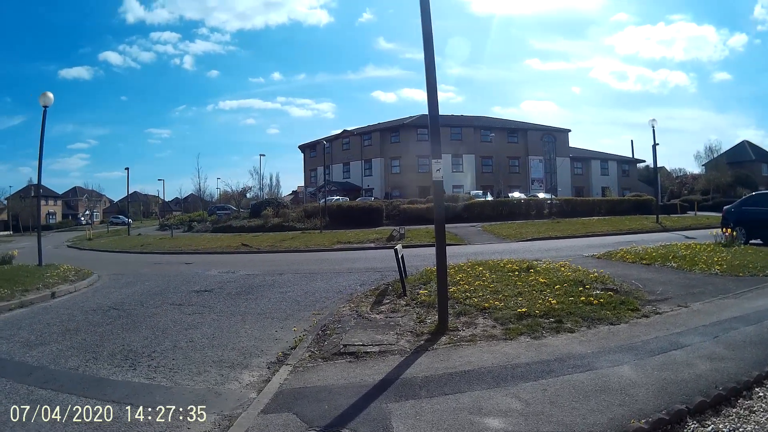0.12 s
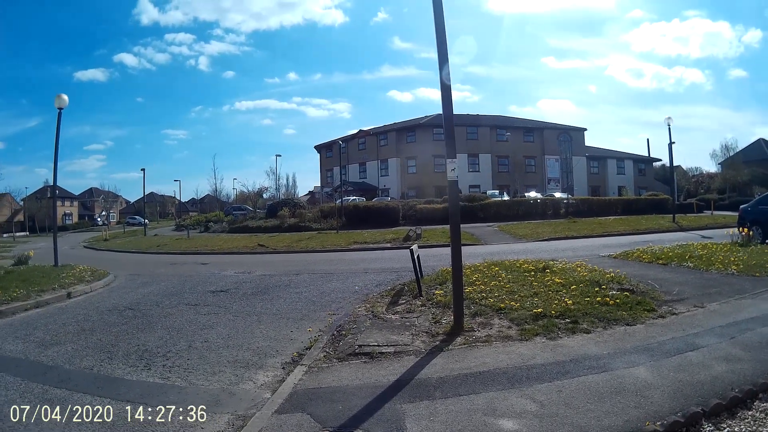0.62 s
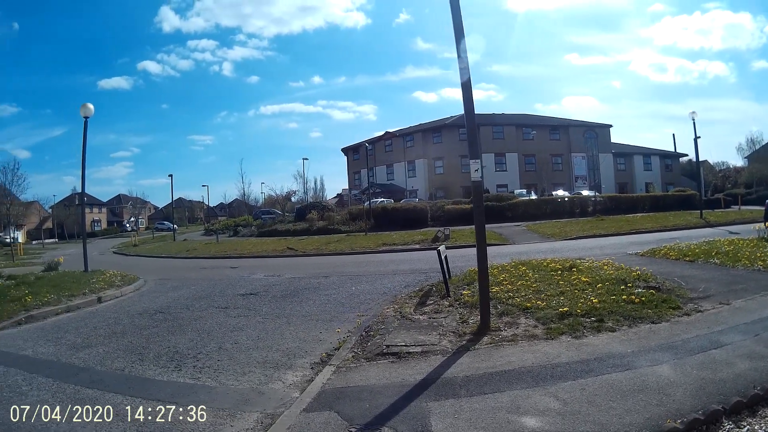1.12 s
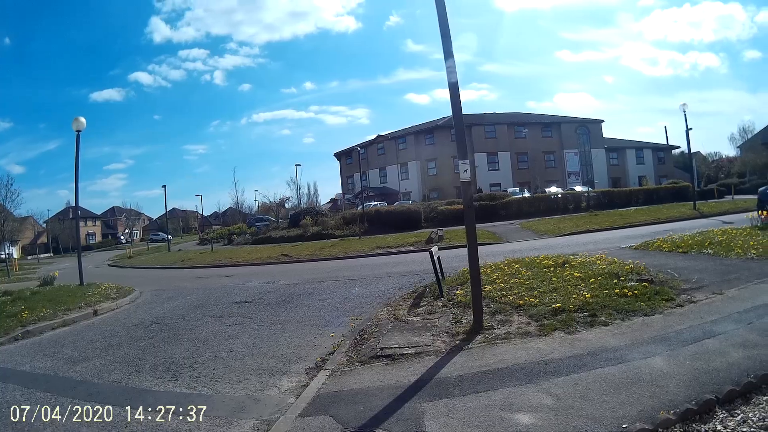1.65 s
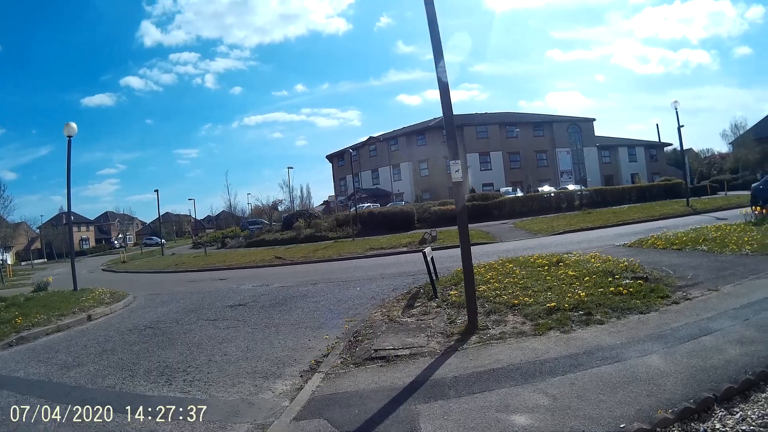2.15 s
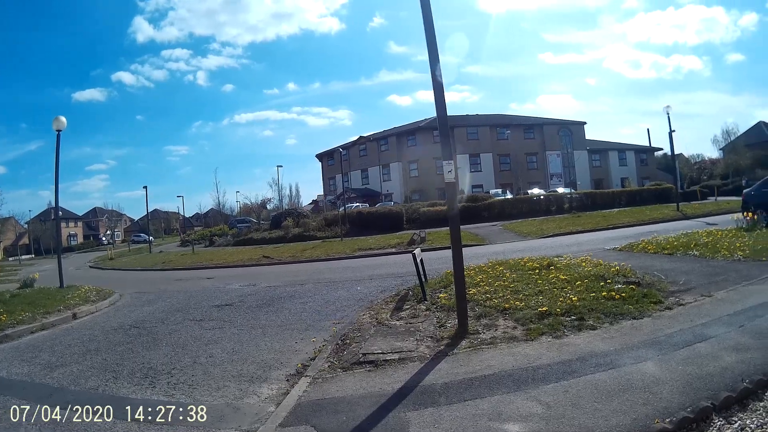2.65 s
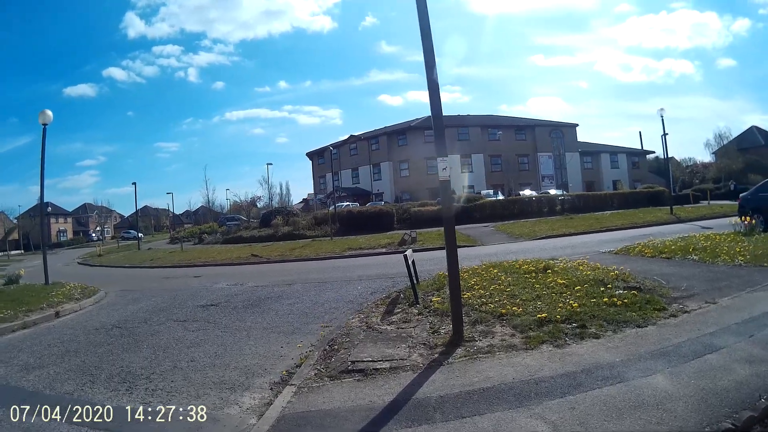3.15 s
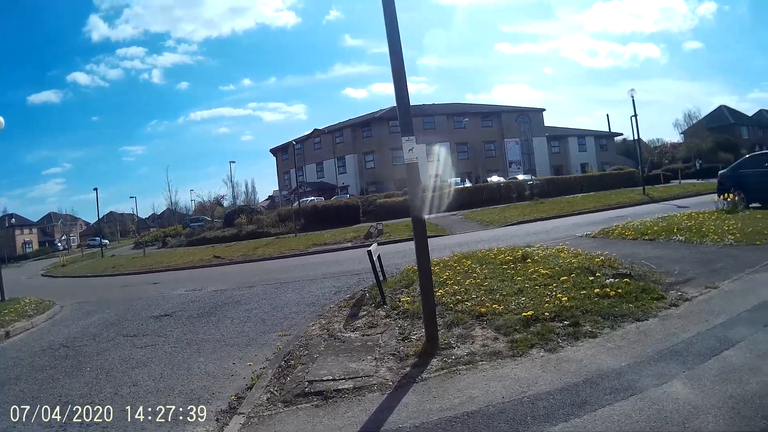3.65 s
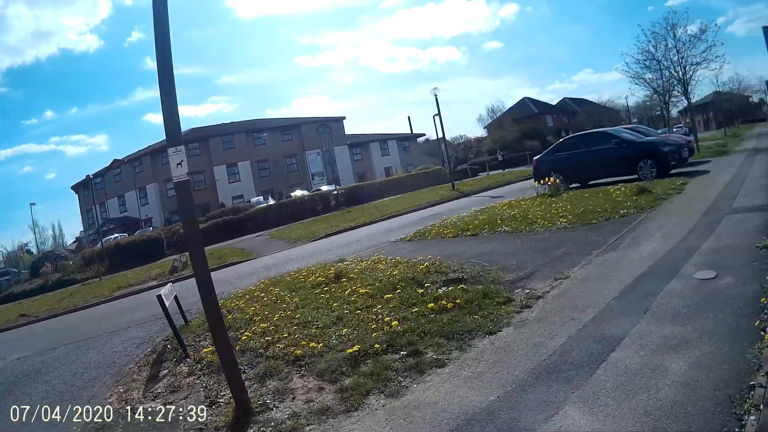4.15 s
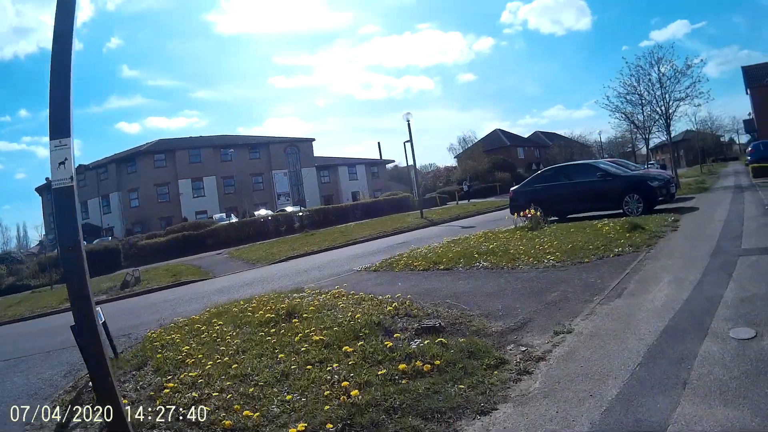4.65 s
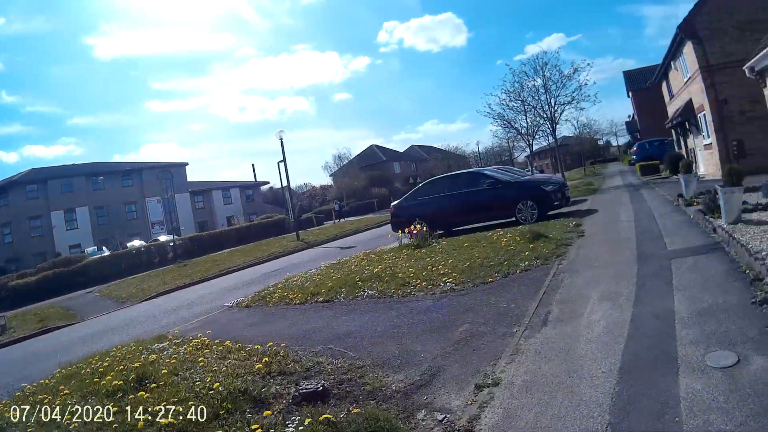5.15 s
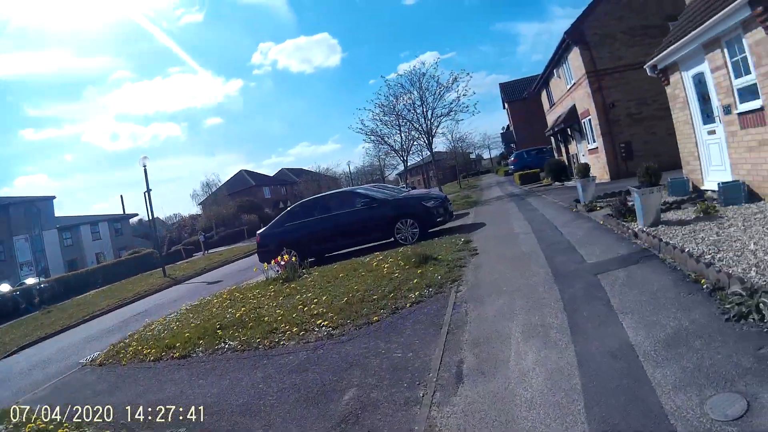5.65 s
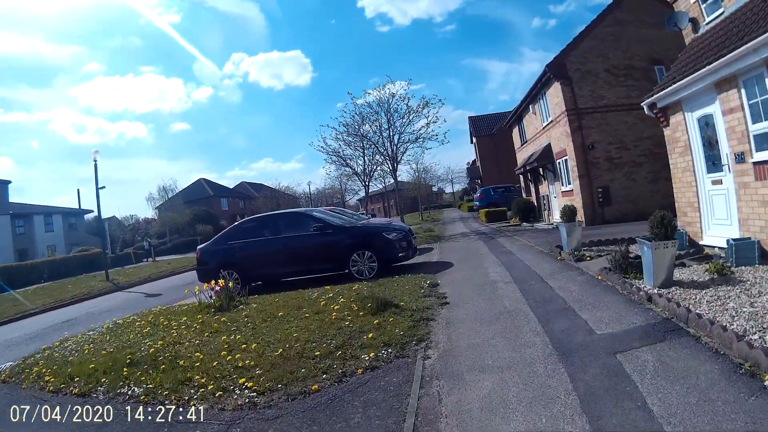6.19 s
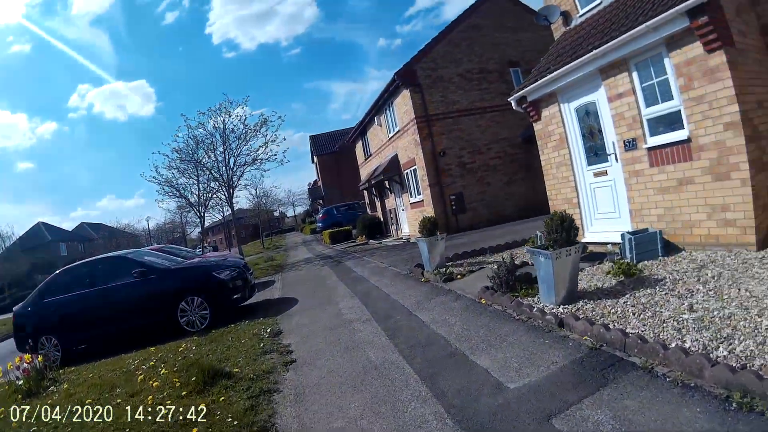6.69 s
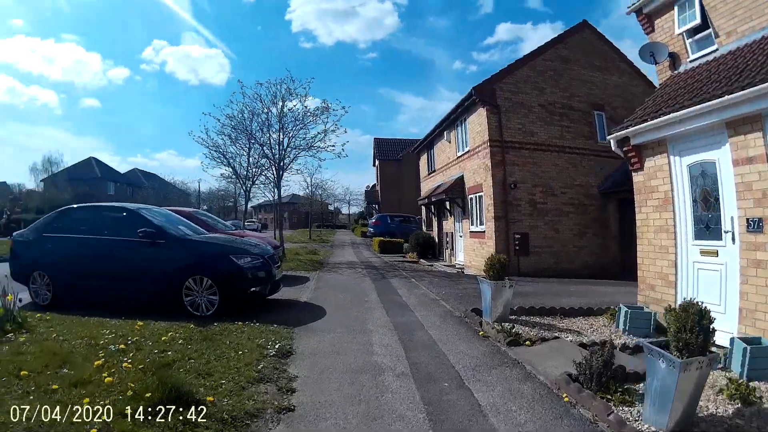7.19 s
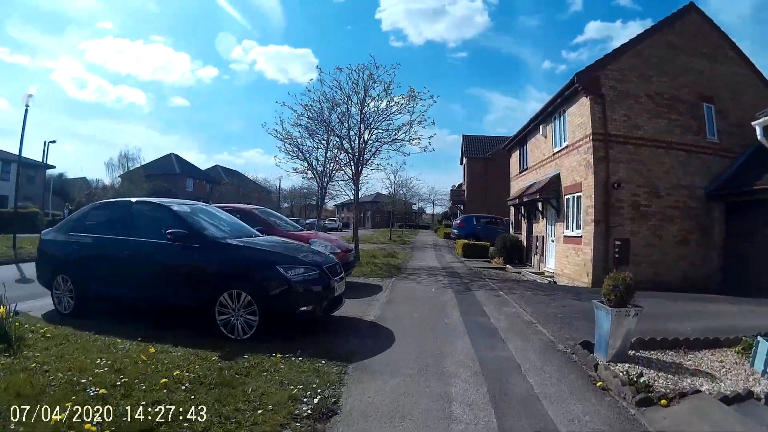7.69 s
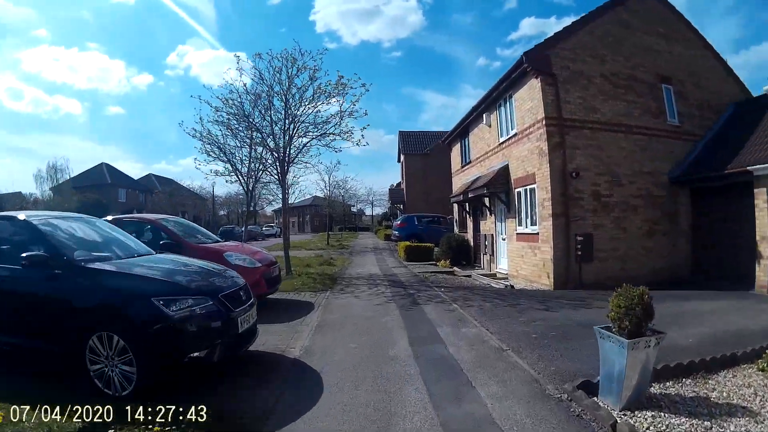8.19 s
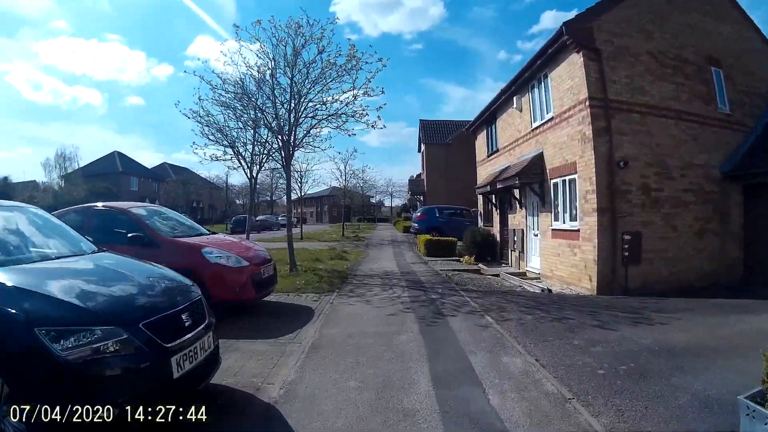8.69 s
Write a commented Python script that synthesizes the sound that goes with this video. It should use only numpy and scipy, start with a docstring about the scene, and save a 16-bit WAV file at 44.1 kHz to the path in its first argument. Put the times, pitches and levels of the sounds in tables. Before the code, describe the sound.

Sparse handling knocks and thumps on a bike frame give way to low tyre rumble, loose case rattle, faint chain ticks and sharp distorted cracks.

```python
"""A low handlebar sway and a humming frame are heard first, through the mount of a small camera on a bicycle.
The rider stands, shuffles and pushes off along a paved path. Sway is a wandering sine; frame, tyre and case
are noise through resonances. Parts knock into the plastic case as decaying modes and noise bursts, some
hard enough to clip; single tones swell and die away, the chain ticks in short tones, and the electronics
leak a faint chopped whistle over a background hiss of coloured noise."""
import sys
import numpy as np
from scipy import signal
from scipy.fft import rfft, irfft, next_fast_len
from scipy.io import wavfile
from scipy.ndimage import map_coordinates

SR = 44100
rng = np.random.default_rng(int(sys.argv[2]) if len(sys.argv) > 2 else 0)


def dump_mix(stems):
    """Bounce the given channels to the path in sys.argv[1] as a 16-bit WAV at rate SR."""
    frames = np.atleast_2d(stems).T  # one column per channel
    limited = np.clip(frames, -1, 1)  # hard clip at full scale
    pcm = np.round(limited * 32767).astype(np.int16)
    wavfile.write(sys.argv[1], SR, pcm)


def magnitude_from_level(level_db):
    """Linear magnitude for a level in decibels (20 dB per decade)."""
    exponent = np.asarray(level_db, float) / 20
    return 10 ** exponent


N = 388962


def unit(x):
    """Power normalisation: scaled to rms 1."""
    return x / np.sqrt(np.mean(x ** 2) + 1e-20)


def peak(x):
    """Amplitude normalisation: scaled to peak 1."""
    return x / np.abs(x).max()


def wobble(rate):
    """Band-limited random modulation: a smooth curve through rate random knots a second."""
    knots = rng.standard_normal(int(N * rate / SR) + 4)
    return map_coordinates(knots, [np.arange(N) * rate / SR])


def curve(table, column):
    """Linear interpolation in time: one column of a table, a value per sample."""
    rows = np.transpose(table)
    return np.interp(np.arange(N) / SR, rows[0], rows[column])


def filtered(x, response):
    """Linear filtering: the spectrum of x times a complex response of frequency."""
    m = next_fast_len(len(x) + 8192)
    return irfft(rfft(x, m) * response(np.fft.rfftfreq(m, 1 / SR)), m)[:len(x)]


def through(x, peaks):
    """Modal superposition: x through causal second-order resonances of alternating sign."""
    def response(f):
        total = 0
        for k, (centre, width, db) in enumerate(peaks):
            resonance = 1j * f * width / (centre * centre - f * f + 1j * f * width)
            total = total + (-1) ** k * magnitude_from_level(db) * resonance
        return total
    return filtered(x, response)


def dulled(x, hz):
    """Low-pass transmission: soft contacts and rubber pass little treble."""
    return signal.sosfilt(signal.butter(3, min(hz, SR / 2.2), fs=SR, output="sos"), x)


def grit(rate, spread_db, t60):
    """Shot-noise excitation: noise whose strength jumps at random small jolts and dies away."""
    sizes = magnitude_from_level(spread_db * np.minimum(rng.exponential(1, N), 3)) * (rng.random(N) < rate / SR)
    jolts = signal.lfilter([1], [1, -magnitude_from_level(-60 / (t60 * SR))], sizes)
    return (1 + jolts) * rng.standard_normal(N)


def ringing(modes, seconds):
    """Free modal decay: metal modes at a new strength for each blow, fluttering as the part wobbles."""
    t = np.arange(int(seconds * SR)) / SR
    total = np.zeros(len(t))
    for hz, db, t60 in modes:
        flutter_db = 1.8 * map_coordinates(rng.standard_normal(int(45 * seconds) + 4), [45 * t])
        total += magnitude_from_level(db + flutter_db - 60 * t / t60) * np.sin(2 * np.pi * hz * t)
    return total


def add(track, s, x):
    """Superposition: mixes x into the track from time s."""
    part = track[round(s * SR):][:len(x)]
    part += x[:len(part)]


# steady handlebar sway: start_s [s], level_db [dB]
STEADY_SWAY = [(0, -49), (.17, -50.5), (1.35, -52), (1.75, -58), (2.3, -49), (2.85, -57), (3.4, -52),
               (4.4, -36.5), (5.4, -40), (6.1, -33), (6.5, -42), (7.4, -32), (8.1, -39.5), (8.82, -34.5)]
# pushes that set the handlebar swinging: start_s [s], level_db [dB], t60_s [s]
SWINGS = [(.3, -36, 1), (.5, -37.5, 1.2), (.97, -32, 1.2), (1.3, -36, 1.5), (1.94, -26, 1.5),
          (2.35, -31.5, 1.5), (3.2, -37.5, .8), (3.439, -30, 2), (3.999, -35, 2), (5.15, -31.5, 1.2),
          (5.46, -33, 1.5), (5.85, -29, 2), (6.52, -29.5, 1.2), (8.2, -30, 1.5)]


def bar_sway_db():
    """Forced and free vibration: a steady sway plus swings that start quickly and die away."""
    level = magnitude_from_level(curve(STEADY_SWAY, column=1))
    for s, db, t60 in SWINGS:
        since = np.maximum(np.arange(N) / SR - s, 0)
        rise = 1 - np.exp(-since / 0.02)  # rise in s
        level += rise * magnitude_from_level(db - 60 * since / t60)
    return 20 * np.log10(level)


def handlebar(sway_db):
    """Low-frequency oscillation: the bar sways at a wandering pitch and strength."""
    hz = 28.9 * (1 + 0.17 * wobble(4.1))
    strength = np.tanh(1.5 + 1.38 * wobble(7))
    swing = np.sqrt(2) * np.sin(2 * np.pi * np.cumsum(hz) / SR)
    return magnitude_from_level(sway_db + 1.8 * wobble(7)) * strength * swing


# base levels of the ride: start_s [s], frame_shake_db [dB], case_rattle_db [dB], tyre_rumble_db [dB]
RIDE_LEVELS = [(0.0, -56.5, -75, -64.5), (0.22, -56, -60, -61.5), (0.37, -36.5, -37, -54.5),
               (0.54, -34.5, -46.5, -39), (0.73, -47.5, -65, -56.5), (1.05, -37, -51, -53.5),
               (1.3, -44.5, -56, -52.5), (1.47, -46, -61, -58), (1.74, -49.5, -70, -60.5),
               (1.92, -63, -73, -68.5), (2.06, -33.5, -57, -57), (2.26, -34, -50, -45.5),
               (2.6, -47.5, -70.5, -62), (2.82, -50, -63, -66), (3.14, -51.5, -67, -53),
               (3.56, -48.5, -59.5, -47.5), (3.73, -44.5, -45.5, -45.5), (4.12, -40.5, -54.5, -47),
               (5.06, -36, -43.5, -40), (5.36, -37, -47.5, -41), (6.58, -34.5, -41, -38.5),
               (7.42, -31, -45.5, -37.5), (7.89, -36.5, -47, -42.5), (8.35, -33.5, -39.5, -37.5),
               (8.52, -32.5, -48, -41), (8.82, -32.5, -47, -39.5)]


def frame_shake_db():
    """Energy decay: the uneven shake of the ride, with an aftershake dying away behind each bump."""
    t = np.arange(N) / SR
    level = magnitude_from_level(curve(RIDE_LEVELS, column=1) + 3 * wobble(6))
    for s, db, *_ in BUMPS:
        level += (t > s) * magnitude_from_level(db - 20.5 - 60 * np.maximum(t - s, 0) / 0.52)  # t60 0.52 s
    return 20 * np.log10(level)


# the main frame resonance slides with the rider's weight and widens once the tyre rolls:
# start_s [s], pitch_hz [Hz], width_hz [Hz]
FRAME_HUM = [(0, 290, 79.3), (0.449, 299.4, 89.5), (0.549, 400, 111.6), (.75, 355, 119.2), (.9, 300.7, 100),
             (1.451, 319.7, 84.2), (1.7, 285, 79.3), (1.95, 285, 75.3), (2.248, 290, 74.5),
             (2.449, 295, 111.2), (2.65, 334.8, 79.8), (3.201, 335.6, 80.9), (3.6, 267.4, 121.1),
             (5.002, 278.6, 120.8), (8.82, 263.4, 109.5)]


def hum():
    """Narrow-band noise: two random quadratures of a sliding frame resonance, at rms 1."""
    pace = np.cumsum(curve(FRAME_HUM, column=2)) / SR  # a wider resonance forgets its phase sooner
    drift = [map_coordinates(rng.standard_normal(int(pace[-1]) + 4), [pace]) for _ in range(2)]
    turn = 2 * np.pi * np.cumsum(curve(FRAME_HUM, column=1)) / SR
    return unit(drift[0] * np.cos(turn) + drift[1] * np.sin(turn))


# upper frame resonances: pitch_hz [Hz], width_hz [Hz], level_db [dB, relative]
FRAME_MODES = [(400, 95, -1), (556, 39, -3.5), (631.6, 48, -3.5), (934, 28, -12)]


def frame(rough):
    """Structural resonance: road texture excites the frame hum and its gritty upper modes."""
    upper = unit(dulled(through(grit(25, 0.71, 0.066), FRAME_MODES), 1400))
    return magnitude_from_level(frame_shake_db()) * (hum() + magnitude_from_level(-6.5 + rough) * upper)


# tyre resonance: pitch_hz [Hz], width_hz [Hz], level_db [dB, relative]
TYRE_MODE = [(178, 52, 0)]


def tyre(tyre_db, rough):
    """Resonant rolling noise: road texture drives the tyre at random."""
    rumble = unit(dulled(through(rng.standard_normal(N), TYRE_MODE), 350))
    return magnitude_from_level(tyre_db + 1.0 + 2.1 * rough) * rumble


# low air resonances: pitch_hz [Hz], width_hz [Hz], level_db [dB, relative]
BUFFET_MODES = [(46.7, 29, 4), (100, 81, -2.5)]


def wind_buffet(tyre_db, sway_db, rough):
    """Low-frequency turbulence: air buffets at the port, following tyre rumble and sway."""
    level_db = tyre_db - 1 + 0.3 * (sway_db - sway_db.mean())
    gust_db = 2 * rough + 4.4 * wobble(7)
    return magnitude_from_level(level_db + gust_db) * unit(dulled(through(rng.standard_normal(N), BUFFET_MODES), 220))


# plastic case resonances: pitch_hz [Hz], width_hz [Hz], level_db [dB, relative]
CASE_MODES = [(1121, 427, -9), (1450, 230, 1.5), (1679, 390, -3), (2145, 570, -17.5), (3080, 190, -24),
              (4000, 700, -53.5)]


def case_rattle(rough):
    """Random impact excitation: many small jolts ring the loose case."""
    level_db = curve(RIDE_LEVELS, column=2) + 1.2 * rough + 1.5 * wobble(30)
    return magnitude_from_level(level_db) * unit(dulled(through(grit(70, 5.5, .018), CASE_MODES), 2952))


# spectrum of the background hiss: pitch_hz [Hz], level_db [dB per Hz, relative]
HISS_SPECTRUM = [(880, -32.5), (1500, -12.5), (2610, -15.5), (6890, -19), (9750, -18.5), (14500, -23.5),
                 (16000, -30.5)]


def background_hiss(tyre_db):
    """Spectral shaping: a background hiss of coloured noise that rises gently with the tyre rumble."""
    hz, db = np.transpose(HISS_SPECTRUM)
    colour = lambda f: magnitude_from_level(np.interp(np.log(f + 1), np.log(hz + 1), db))
    level_db = -63.5 + 0.26 * (tyre_db - tyre_db.mean())
    return magnitude_from_level(level_db) * unit(filtered(rng.standard_normal(N), colour))


def ride():
    """Common modulation: one roughness curve shapes frame, tyre, case and buffet; sway and hiss join them."""
    sway_db, tyre_db = bar_sway_db(), curve(RIDE_LEVELS, column=3)
    rough = wobble(14)
    shaken = frame(rough) + tyre(tyre_db, rough) + case_rattle(rough)
    buffet = wind_buffet(tyre_db, sway_db, rough)
    return handlebar(sway_db) + shaken + buffet + background_hiss(tyre_db)


def electronics():
    """Square-wave modulation: a faint whistle is chopped, a little stronger with more tyre rumble."""
    t = np.arange(N) / SR
    tyre_db = curve(RIDE_LEVELS, column=3)
    whistle_hz, chop_hz = 9525.4, 36.356
    chop = np.where((t * chop_hz - .31) % 1 < .5, 1, -.22)  # the weak half is inverted
    level_db = -65.5 + 0.14 * (tyre_db - tyre_db.mean())
    return magnitude_from_level(level_db) * chop * np.sin(2 * np.pi * whistle_hz * t)


# thump of the mount: pitch_hz [Hz], width_hz [Hz], level_db [dB, relative]
THUMP_MODES = [(243, 57, 2), (400, 158, -2.3), (702, 170, -2)]
# bright crack of a contact: pitch_hz [Hz], width_hz [Hz], level_db [dB, relative]
CRACK_MODES = [(2320, 180, 1), (3040, 250, 0), (3560, 440, 3), (4325, 1300, -5), (7020, 1100, -16),
               (11000, 4400, -27)]


def knocks(table, ring, scrape, rise_s, bright_hz, brightens=0):
    """Impact excitation: a blow rings and scrapes the case, thumps the mount, cracks; metal may ring on."""
    out, t = np.zeros(N), np.arange(SR // 10) / SR
    rise = 1 - np.exp(-t / max(rise_s, 1 / SR))
    for s, db, hz, t60, thump_db, crack_db in table:
        t60 = max(t60, .005)
        lower, upper, side = rng.uniform(.8, .9), rng.uniform(1.25, 1.45), rng.choice([-1, 1])
        modes = np.sin(2 * np.pi * hz * t)
        modes += 0.14 * np.sin(2 * np.pi * hz * lower * t)
        modes += 0.26 * np.sin(2 * np.pi * hz * upper * t)
        body = side * magnitude_from_level(-60 * t / t60) * modes
        # crack, thump and scrape noise die at different rates
        decay = magnitude_from_level(-60 * t / (t60 * np.array([[.6], [.8], [1.6]])))
        chatter = rng.standard_normal((3, len(t))) * decay
        crack_hz = bright_hz * magnitude_from_level(brightens * db)
        crack = magnitude_from_level(crack_db) * peak(dulled(through(chatter[0], CRACK_MODES), crack_hz))
        thump = magnitude_from_level(thump_db) * peak(dulled(through(chatter[1], THUMP_MODES), 2460))
        rub = scrape * peak(dulled(through(chatter[2], CASE_MODES), 2115.6))
        add(out, s, magnitude_from_level(db) * rise * (body + rub + crack + thump))
        if ring:
            add(out, s, magnitude_from_level(db) * ringing(ring, 0.67))
    return out


def hard(table):
    """Contact stiffening: hard knocks share one decay; the harder, the more crack."""
    return [(s, db, hz, 0.019, thump_db, -8.5 + 0.8 * db) for s, db, hz, thump_db in table]


# hard knocks on the case: start_s [s], level_db [dB], pitch_hz [Hz], thump_db [dB, relative]
SNAPS = [(0.196, 4.5, 1485, -20), (2.8976, 3, 1470, -15.5)]
# metal that rings on after a snap: pitch_hz [Hz], level_db [dB, relative], t60_s [s]
SNAP_RING = [(910, -54, .55), (1244, -52, .8), (1330, -47, .5), (1637, -54, 1.2), (1755, -48, .15),
             (1836, -56, .3), (2955, -70, .5), (3225, -69, .5), (3800, -46, .04), (4436, -63, .55),
             (4791, -67, .33), (5378, -68, .2)]


def snaps():
    """Hard impact: early sharp knocks with a faint scrape and long metal modes."""
    return knocks(hard(SNAPS), SNAP_RING, scrape=0.13, rise_s=0.0002, bright_hz=14220)


# softer taps: start_s [s], level_db [dB], pitch_hz [Hz], crack_db [dB, relative, before a 5 dB lift]
TAPS = [(0.3277, -36, 1550, -25), (0.387, -14, 1480, -34), (0.402, -14.5, 1560, -50),
        (0.4367, -24.5, 1510, -48), (0.487, -5, 1520, -37), (0.7924, -27, 1540, -15.5),
        (0.8368, -39, 1740, -23), (0.8994, -40.5, 1680, -13), (1.0798, -37, 1840, -29),
        (1.3367, -39, 1614, -16), (0.8564, -33, 1500, -33), (0.9667, -35, 1720, -44),
        (1.015, -33, 1520, -41), (1.0474, -28, 1460, -35), (1.1655, -26.5, 1506, -34),
        (1.254, -44, 1510, -21), (1.2964, -45, 1490, -30), (1.381, -41, 1500, -30),
        (1.4082, -40, 1576, -16), (1.4635, -36, 1450, -42), (1.6868, -34, 1420, -43),
        (1.7237, -32, 1450, -46), (1.7519, -44, 1490, -33), (1.8705, -14, 1614, -33),
        (1.929, -1.5, 1574, -21), (1.9467, -16.5, 1500, -40), (1.9654, -19.5, 1580, -44),
        (2.2094, -36.5, 1630, -5), (2.2562, -42, 1460, -4), (2.2707, -11.5, 1450, -40),
        (2.2835, 2, 1570, -17), (2.3114, -21, 1526, -40), (2.37, -40, 1500, -18), (2.4157, -48, 1640, -11),
        (3.2893, -42, 1450, -21), (3.5137, -41.5, 1414, -30), (3.582, -36, 1560, -36),
        (3.683, -4, 1313, -18), (3.8206, -33, 1504, -34), (3.8655, -38, 1515, -28),
        (3.915, -40.5, 1620, -34), (4.0065, -31, 1530, -31), (4.5321, -34, 1439, -34),
        (4.6626, -32, 1600, -32), (4.804, -37, 1527, -19), (4.8455, -42, 1583, -27),
        (4.8777, -24, 1532, -17.5), (5.0646, -28.5, 1498, -42), (5.117, -29, 1515, -35),
        (5.2056, -20, 1101, -46), (5.3468, -25.5, 1564, -40), (5.3881, -32.5, 1400, -34),
        (5.55, -35, 1754, -34), (5.7428, -30.5, 1585, -27), (5.7718, -26.5, 1590, -21),
        (5.8301, -22, 1617, -17), (5.8995, -24, 1416, -22), (5.958, -31, 1359, -15),
        (6.5928, -25, 1432, -22), (6.6787, -24, 1540, -18), (6.761, -21.5, 1550, -14.5),
        (7.325, -17, 1610, -22), (7.9805, -29, 1634, -38), (8.2793, -19.5, 1478, -17),
        (8.3547, -24, 1540, -18), (8.8039, -29.5, 1497, -16)]


def stray_taps(count=12):
    """Random impacts: stray taps fall anywhere, with levels that follow the rattle."""
    luck = rng.random((count, 4))
    at = luck[:, 0] * (N - 1)
    level_db = curve(RIDE_LEVELS, column=2)[at.astype(int)] + 12 + 8 * (luck[:, 1] - .5)
    pitch_hz = 1520 * (1 + 0.19 * (luck[:, 2] - .5))
    crack_db = -26 + 24 * (luck[:, 3] - .5)  # before the same 5 dB lift
    return zip(at / SR, level_db, pitch_hz, crack_db)


def taps():
    """Soft impact: harder taps tend to die faster and have a brighter crack; thumps vary at random."""
    table = []
    for s, db, hz, crack_db in [*TAPS, *stray_taps()]:
        t60 = 0.021 * np.exp(-0.018 * db + rng.normal(0, .25))
        table.append((s, db, hz, t60, -1.5 + rng.normal(0, 0.95), crack_db + 5))
    return knocks(table, None, scrape=.8, rise_s=0.00063, bright_hz=10810, brightens=0.21)


# heavy bumps that shake the whole frame: start_s [s], level_db [dB], t60_s [s], ring_db [dB, relative]
BUMPS = [(0.486, -9, 0.13, -41), (1.876, -13, 0.083, -21), (1.929, -5, 0.16, -27), (2.273, -8, 0.15, -28),
         (2.284, -16, 0.13, -32), (3.679, -13, 0.13, -33)]
# frame modes that last after a bump: pitch_hz [Hz], level_db [dB, relative], t60_s [s]
FRAME_RING = [(431, -14, .3), (510, -12, .5), (590, -14, .4), (660, -6, 1.2), (824, -15, 1), (915, -14, 1),
              (1604, -19, 2.5)]


def bumps():
    """Transient structural response: a bump shakes mount and case, thuds low and leaves the frame ringing."""
    out, t = np.zeros(N), np.arange(SR // 2) / SR
    for s, db, t60, ring_db in BUMPS:
        shudder = rng.standard_normal((3, len(t))) * magnitude_from_level(-60 * t / max(t60, .02))
        mount = peak(through(shudder[0], THUMP_MODES))
        case = magnitude_from_level(-8) * peak(through(shudder[1], CASE_MODES))
        thud = magnitude_from_level(-17) * peak(dulled(through(shudder[2], BUFFET_MODES), 200))
        add(out, s, magnitude_from_level(db) * (dulled(mount + case, 2460) + thud))
        add(out, s, magnitude_from_level(db + ring_db) * ringing(FRAME_RING, 0.96))
    return out


# chain ticks: start_s [s], level_db [dB], low_click_db [dB, relative, before an 8 dB lift]
TICKS = [(0.4978, -34, -4), (0.5635, -49, 3), (0.579, -39, -18), (0.6083, -42.5, -4.5), (0.655, -46, -9),
         (2.365, -47, -1), (3.741, -47, -10), (3.762, -62, 14), (3.787, -42.5, -6), (3.8464, -48, -15),
         (4.5076, -46, -5), (4.9117, -43, -20), (5.0973, -36.5, -8), (5.1448, -37, -4), (5.178, -31, -12),
         (5.1815, -45.5, 8), (5.9006, -43, 2), (5.937, -51, 11), (5.9497, -39, -4), (6.565, -45, 2.5),
         (6.638, -40, -4), (6.6783, -40, -9), (7.5093, -43, -15), (7.535, -44, -3), (7.611, -41, -18),
         (7.7406, -44, -16), (7.7997, -42, -18), (8.0577, -45, -17), (8.3205, -40, 2), (8.641, -42, -16)]


def chain():
    """Short metallic impact: each tick is a high and a low decaying tone, with a fainter neighbour."""
    out, t = np.zeros(N), np.arange(SR // 100) / SR
    faint = [(s + 0.03 * rng.uniform(-1.1, 1), db - 8, low_db) for s, db, low_db in TICKS]
    for s, db, low_db in TICKS + faint:
        high = magnitude_from_level(-60 * t / 0.0052) * np.sin(2 * np.pi * rng.normal(11400, 250) * t)
        low = magnitude_from_level(low_db + 8 - 60 * t / .005) * np.sin(2 * np.pi * rng.normal(3300, 250) * t)
        contact = .2 * magnitude_from_level(-60 * t / .002) * rng.standard_normal(len(t))
        add(out, s, magnitude_from_level(db) * (high + low + contact))
    return out


# single tones that swell and die away; the one at 6.0 s stands for a brief scrape:
# start_s [s], level_db [dB], pitch_hz [Hz], rise_s [s], t60_s [s]
SWELLING_TONES = [(.5, -12.5, 402, 0.012, 0.11), (3.684, -19.5, 2110, 0.00091, 0.053),
                  (3.69, -35, 1333, 0.0036, 0.45), (3.708, -22.5, 400.5, 0.03, .16),
                  (6.0, -37, 1313, 0.029, 0.14)]


def swelling_tones():
    """Exponential build-up and decay: single sine tones swell and die away."""
    out, t = np.zeros(N), np.arange(SR // 2) / SR
    for s, db, hz, rise_s, t60 in SWELLING_TONES:
        swell = peak((1 - np.exp(-t / rise_s)) * magnitude_from_level(-60 * t / t60))
        add(out, s, magnitude_from_level(db) * swell * np.sin(2 * np.pi * hz * t))
    return out


# hard knocks while riding: start_s [s], level_db [dB], pitch_hz [Hz], thump_db [dB, relative]
CLACKS = [(6.2315, 3.5, 1390, -12), (6.3014, 2.5, 1403, -11.5), (6.37, -6, 1444, -11),
          (6.5078, -1.5, 1448, -11.5), (7.3331, 7, 1403, -15.5), (7.8431, 4.5, 1406, -10),
          (7.8891, -10.5, 1420, -7), (8.4788, 8, 1386, -12)]
# metal that rings on after a clack: pitch_hz [Hz], level_db [dB, relative], t60_s [s]
CLACK_RING = [(1254, -45, .3), (1604, -32, .1), (2040, -40, .08), (3000, -67, .8), (3250, -68, .7),
              (3700, -50, .07), (4030, -45, .09), (4130, -47, .09), (5378, -66, .2), (7154, -64, .2)]


def clacks():
    """Hard impact with friction: riding knocks scrape more and ring other metal modes."""
    return knocks(hard(CLACKS), CLACK_RING, scrape=0.35, rise_s=0.0001, bright_hz=14160)


def scene():
    """Superposition: everything that reaches the microphone, mostly through the mount."""
    return (ride() + snaps() + taps() + bumps() + chain() + swelling_tones() + clacks())[None]


def duller_after_knocks(x, loud):
    """Time-varying filtering: the sound is duller for about a tenth of a second after each loud knock."""
    late = np.pad(loud, (SR // 80, 0))[:N]
    fade_s, treble_hz = 0.098, 4510
    memory = np.minimum(signal.lfilter([.025], [1, -np.exp(-1 / (fade_s * SR))], late), 1)
    treble = filtered(x, lambda hz: 1 / (1 + (treble_hz / (hz + 1)) ** 6))
    return x + (magnitude_from_level(-5.5 * memory) - 1) * treble


def top_cut(x):
    """Nothing passes above the cut-off."""
    return signal.sosfilt(signal.butter(12, 16870, fs=SR, output="sos"), x)


def record(dry):
    """Saturation and band limiting: the preamp clips, loud knocks leave dullness, the converter cuts the top."""
    rail = 0.64
    clipped = dry / (1 + np.abs(dry / rail) ** 8) ** (1 / 8)
    loud = np.abs(dry[0]) > .9
    darkened = duller_after_knocks(clipped[0] + electronics(), loud)
    heard = filtered(darkened, lambda hz: 1 / (1 + (hz / 16400) ** 60))
    return top_cut(heard[None])


dry = scene()
out = record(dry)
dump_mix(out)
```